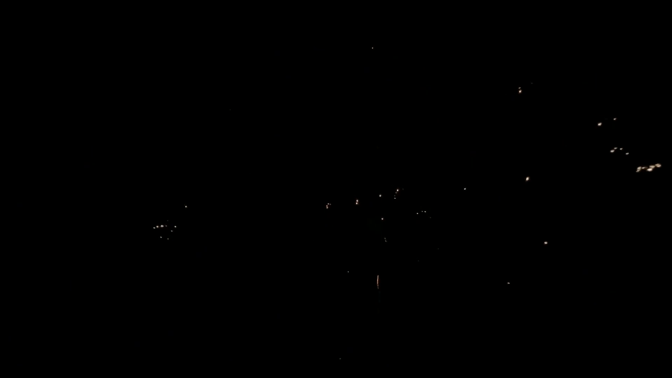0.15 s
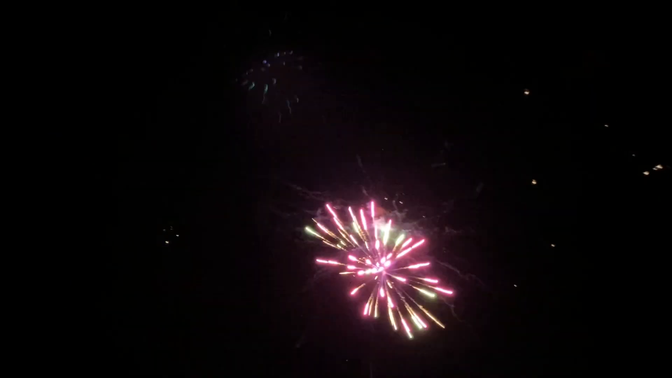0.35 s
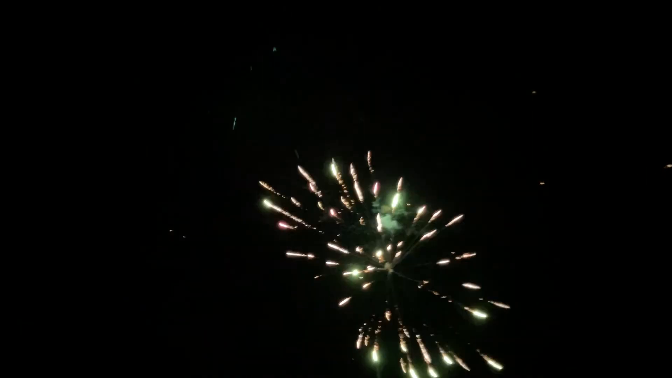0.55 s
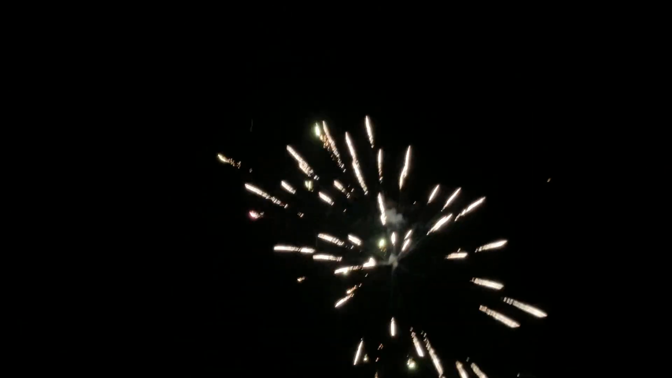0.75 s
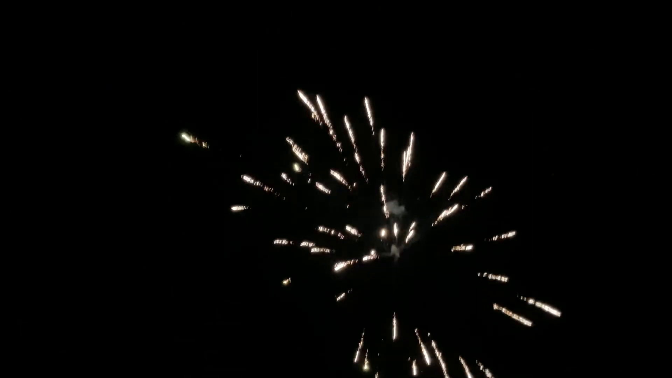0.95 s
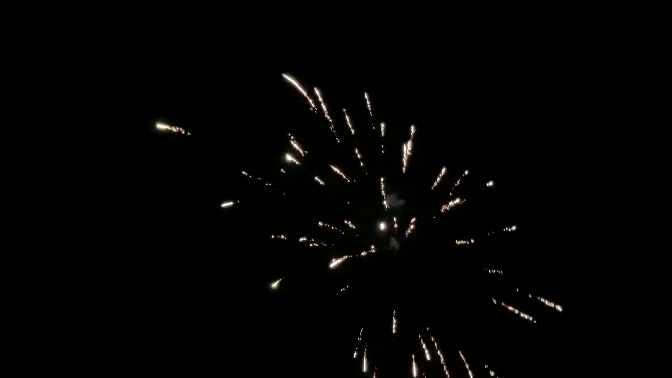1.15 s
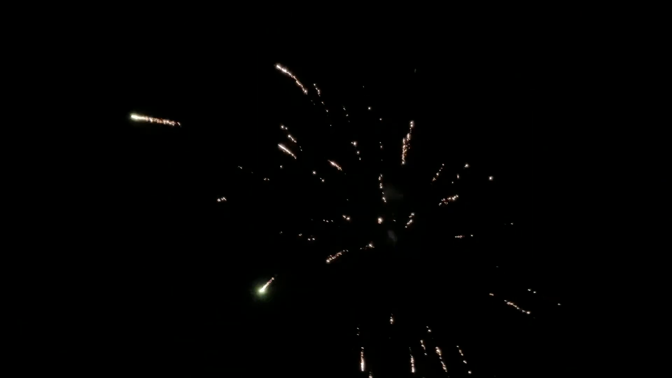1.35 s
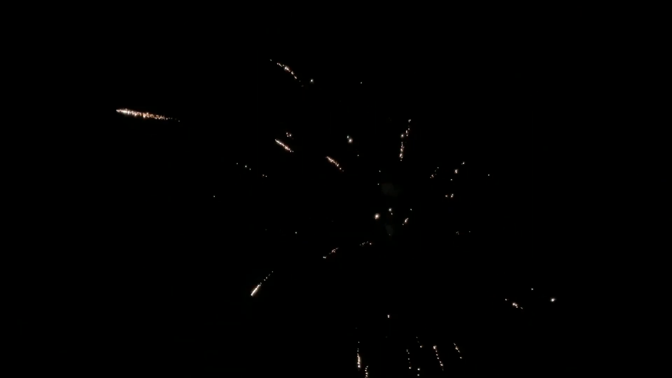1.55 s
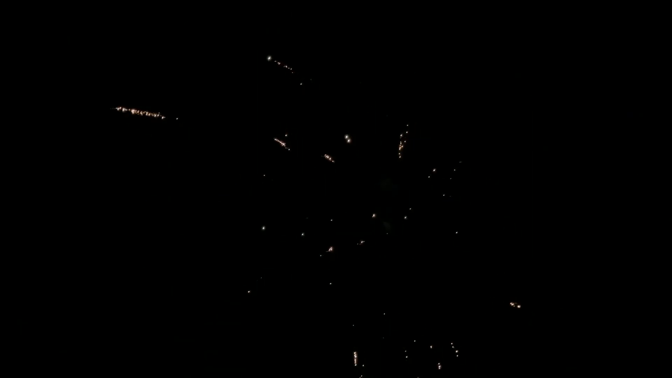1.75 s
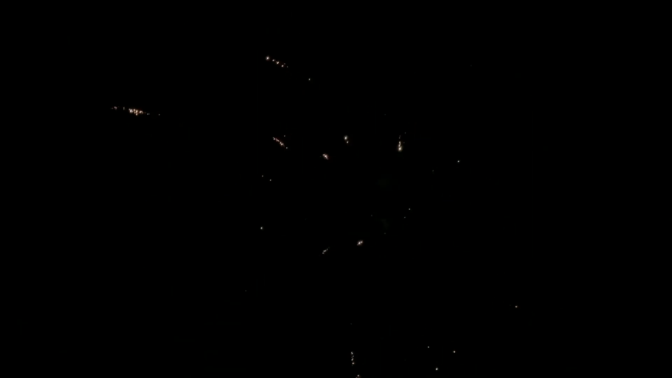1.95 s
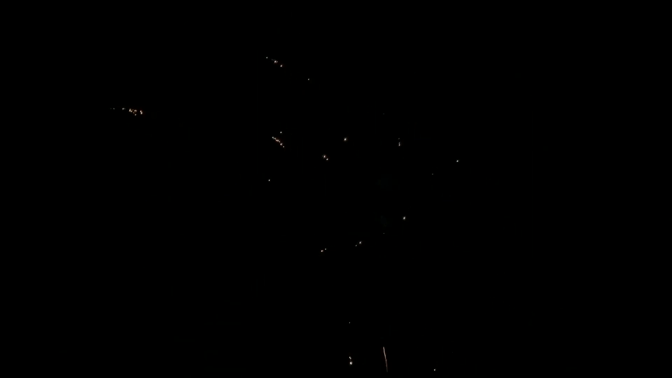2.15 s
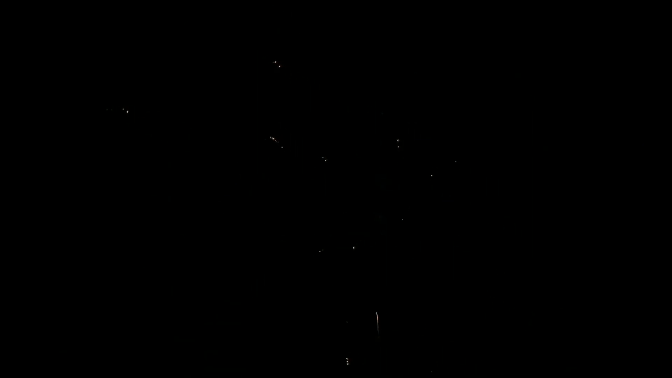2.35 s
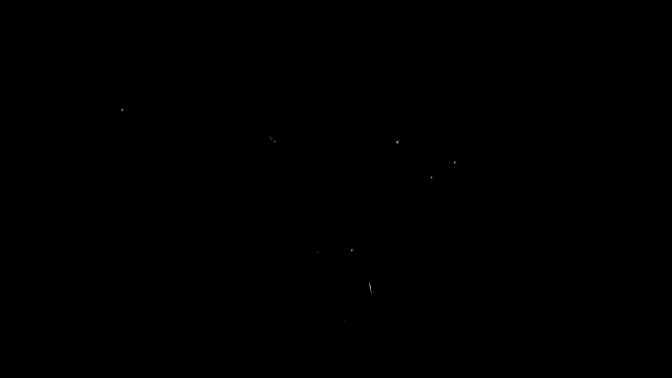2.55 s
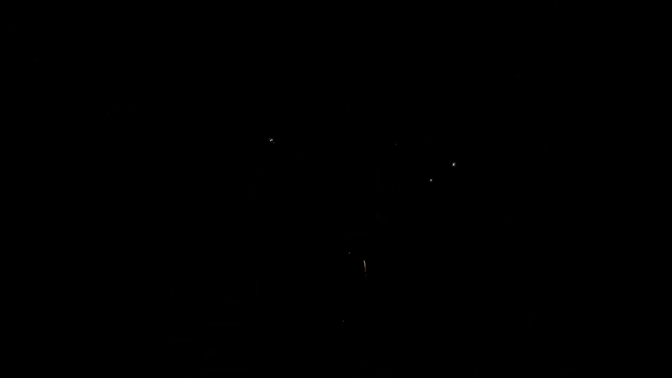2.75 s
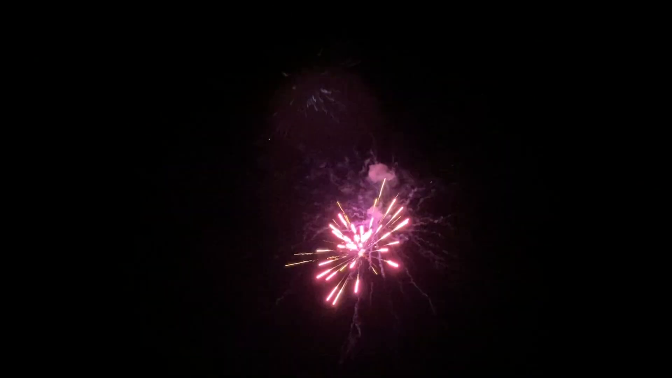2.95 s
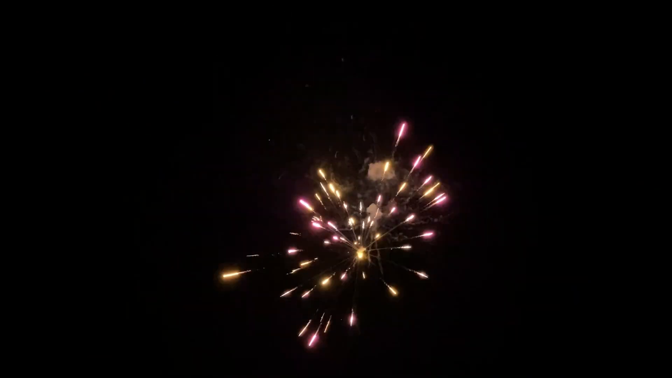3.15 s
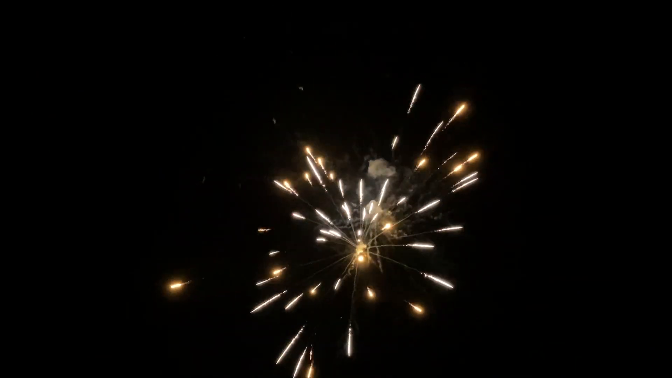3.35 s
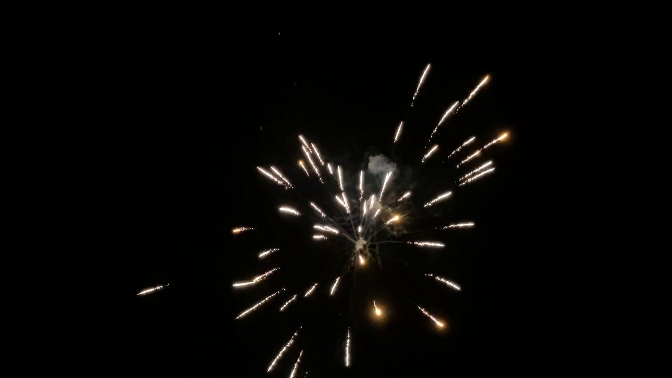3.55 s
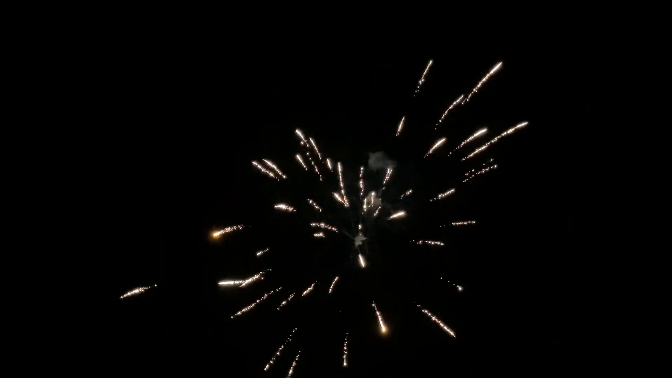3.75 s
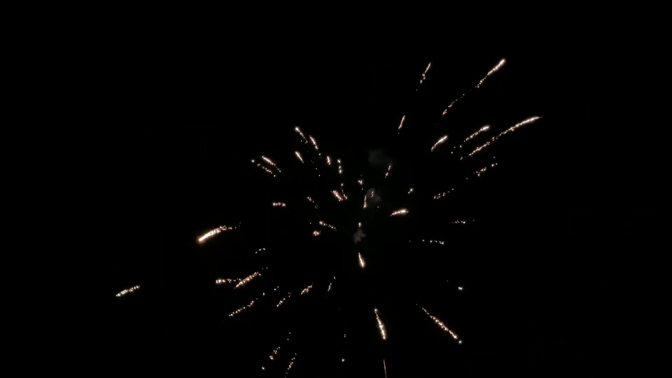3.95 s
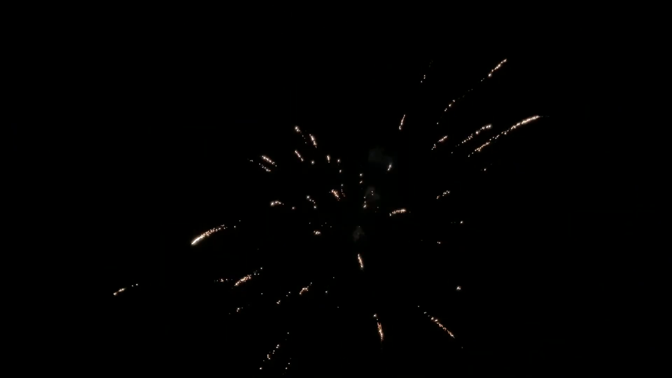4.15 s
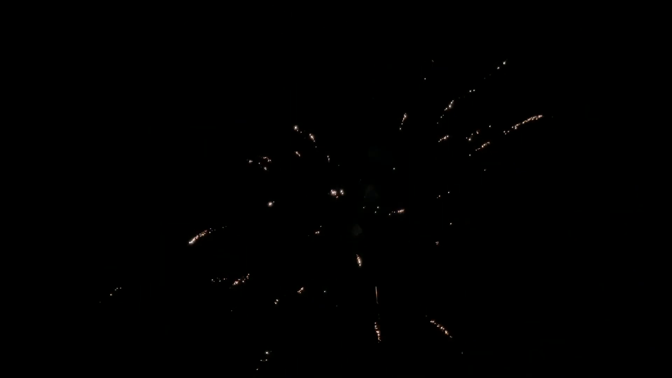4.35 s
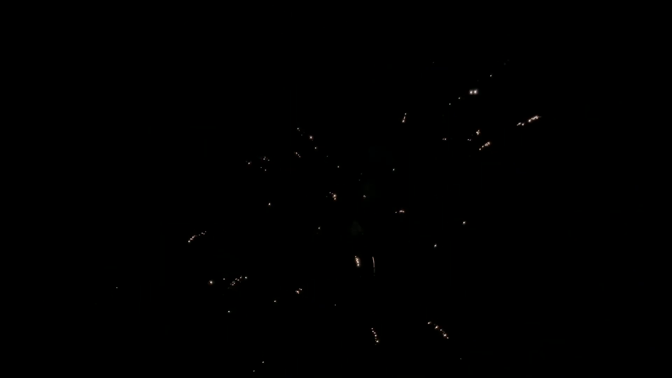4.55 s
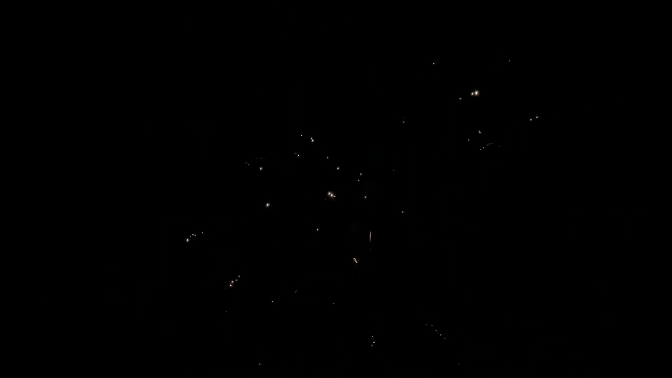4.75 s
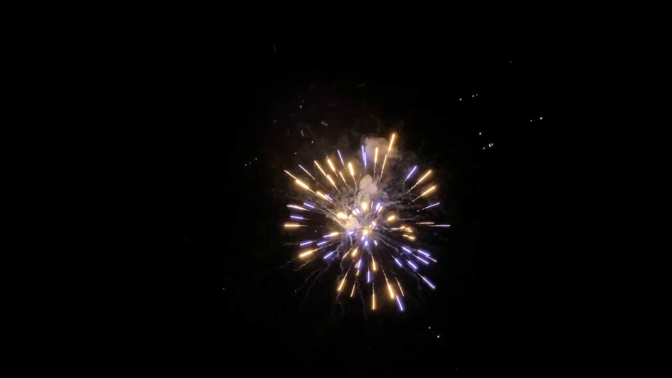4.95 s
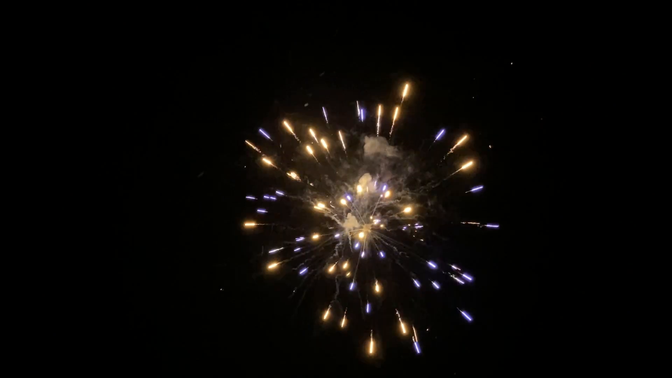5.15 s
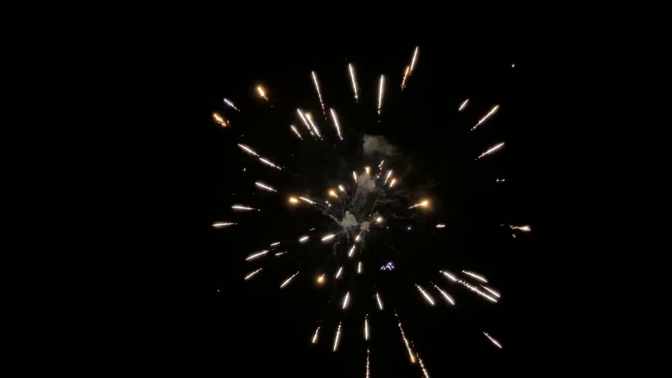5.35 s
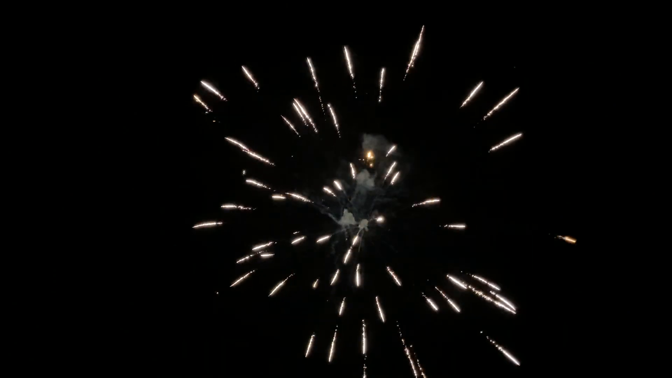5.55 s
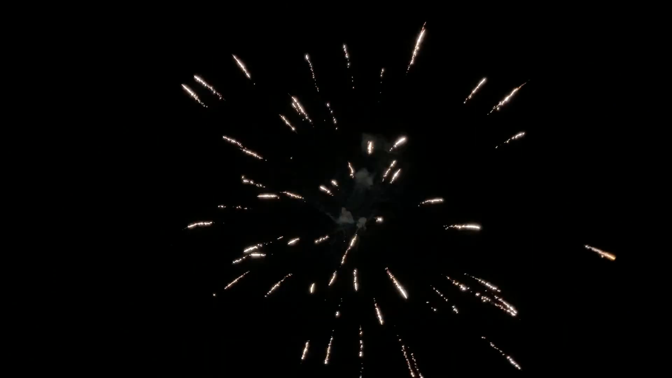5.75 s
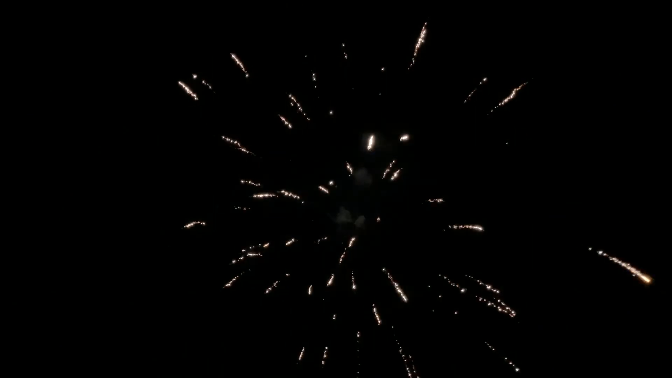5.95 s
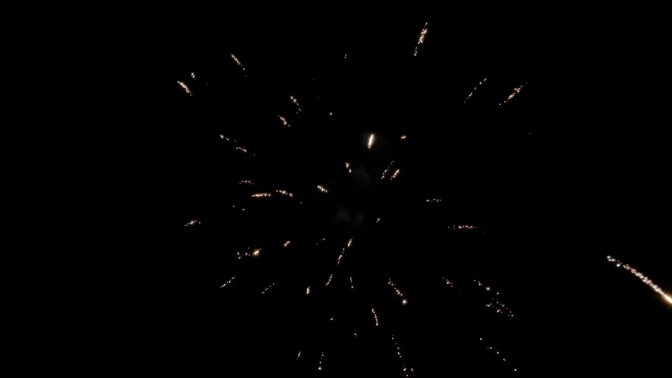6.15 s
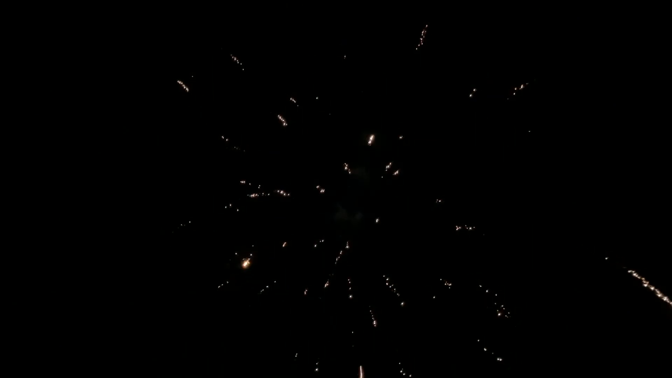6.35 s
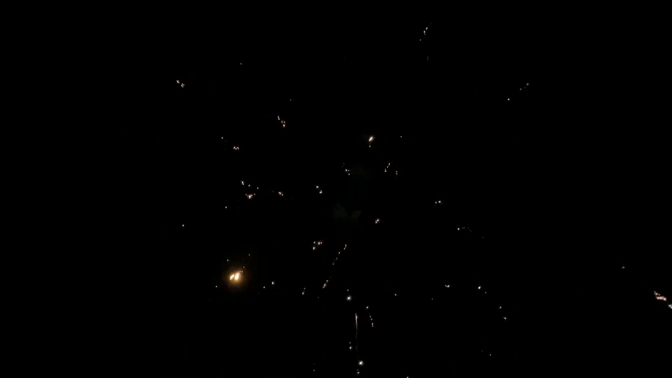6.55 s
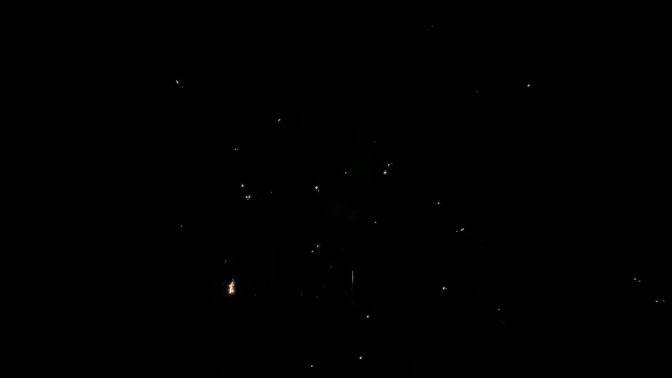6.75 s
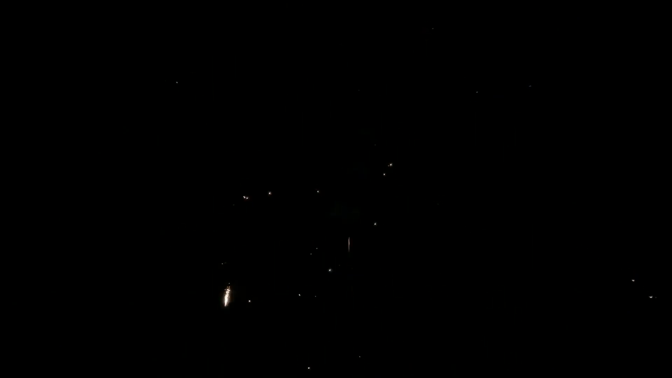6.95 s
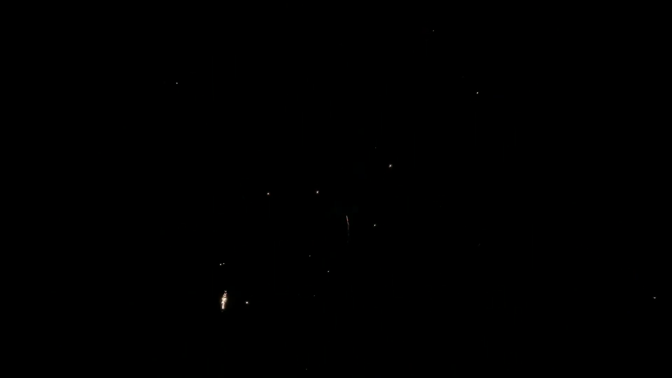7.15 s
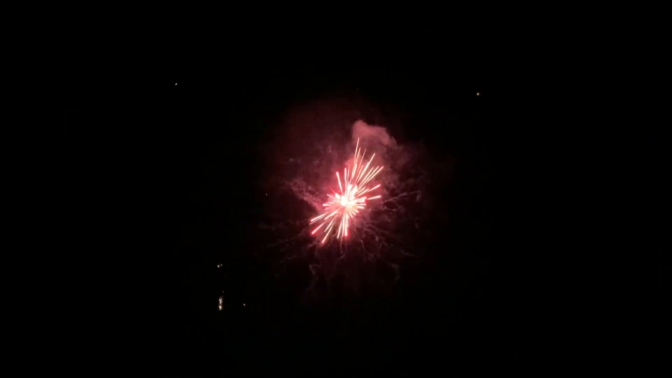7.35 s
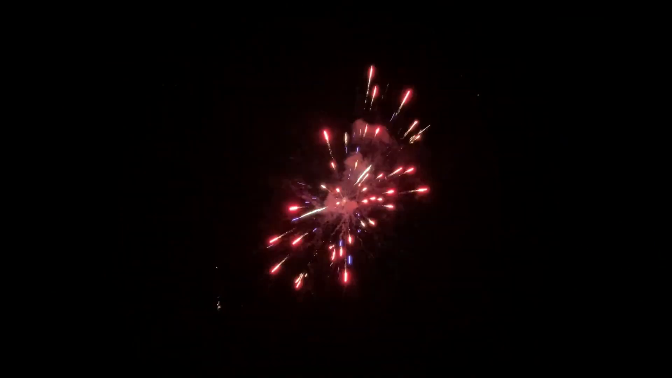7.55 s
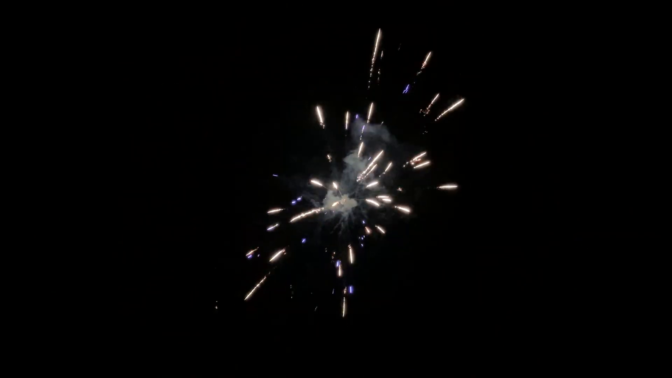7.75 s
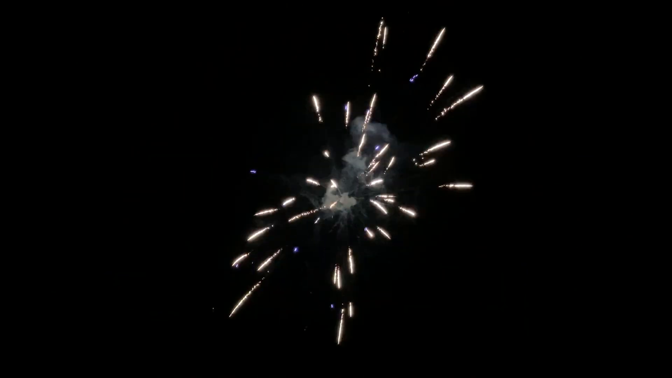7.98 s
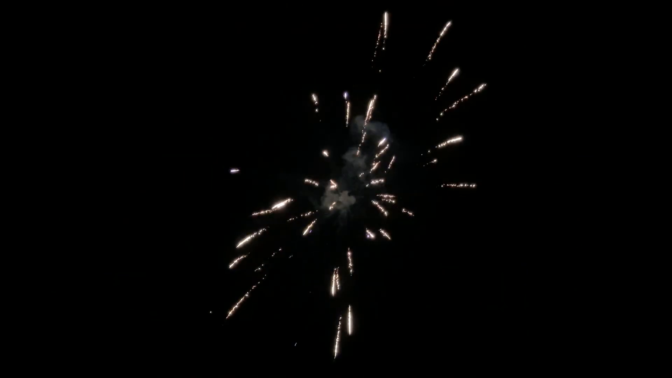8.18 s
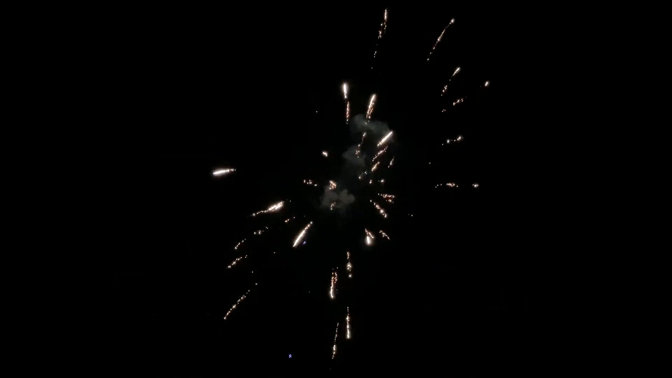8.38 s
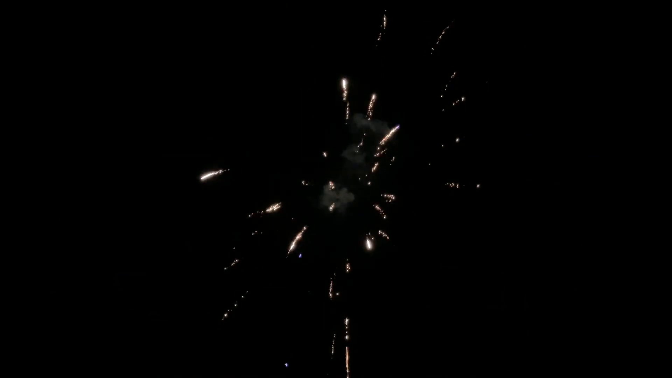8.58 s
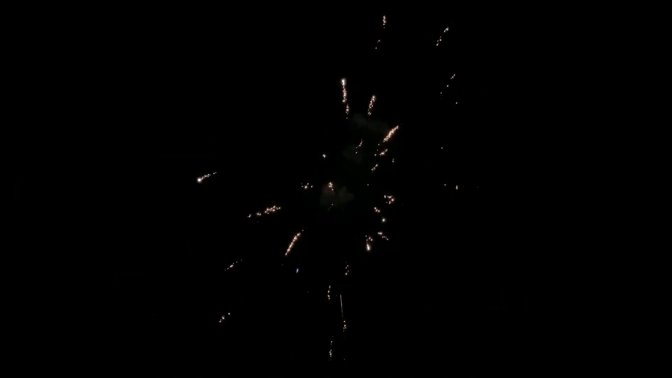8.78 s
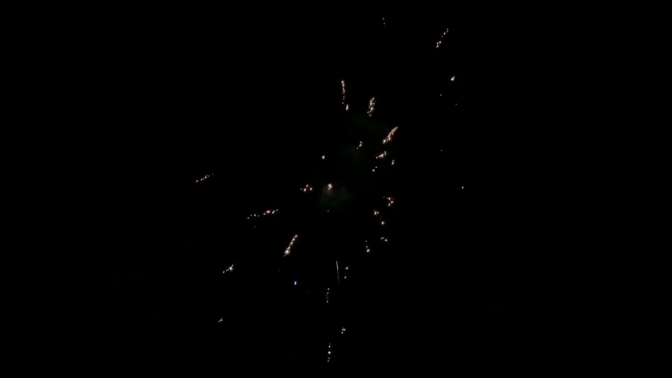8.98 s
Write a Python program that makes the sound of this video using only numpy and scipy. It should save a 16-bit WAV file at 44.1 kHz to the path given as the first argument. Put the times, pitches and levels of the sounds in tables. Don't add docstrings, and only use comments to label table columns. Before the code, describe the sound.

Four loud aerial firework bursts alternate with ground thumps in a yard among houses, their clipped echoes rolling between faint distant pops.

```python
import sys
import numpy as np
from scipy import signal
from scipy.fft import rfft, irfft, next_fast_len
from scipy.io import wavfile
from scipy.ndimage import uniform_filter1d

SR = 44100
rng = np.random.default_rng(int(sys.argv[2]) if len(sys.argv) > 2 else 0)


def rack_gain(trim_db):
    fader = np.asarray(trim_db, float)
    return 10 ** (fader / 20)


def wav_record(signal):
    frames = np.transpose(np.atleast_2d(signal))
    bounded = np.clip(frames, -1, 1)
    quanta = np.round(bounded * 32767).astype(np.int16)
    wavfile.write(sys.argv[1], SR, quanta)


N = 397782
LEFT_LAG = 12

# start_s, strength_db, bright_db, gate_opens_after_s, held_down_db
BURSTS = [
    (0.4688, -2.5, 4, 0.033, 16.5),
    (3.1172, -2.5, 4, 0.034, 13.5),
    (5.06, -2, 0, .001, -4),
    (7.5326, -2.5, 4.5, 0.012, 22.5),
]
# start_s, strength_db, bright_db, gate_opens_after_s,
# held_down_db
LIFTS = [
    (1.6459, -2, -1, .062, 32.5),
    (3.6527, -2.5, -8, 0.00092, 2.5),
    (6.1765, 0.5, 2.5, 0.038, 32.5),
    (8.3981, -1.5, -2.5, .001, 7.5),
]
# delay_s, boom_db, thud_db, snap_db,
# crack_db
SKY_PATHS = [(0, -6, -0.5, -9.5, -6), (.0045, -7, -9.5, -7, -9.5), (.0315, -27.5, -14, -21, -47.5),
             (.036, -14, 1, -10.5, -46.5), (.041, -19, -12.5, -13, -49.5), (.046, -9, -0.5, -10.5, -52),
             (0.051, -14, -13.5, -22.5, -60.5), (.0735, -8.5, -1.5, -20, -29),
             (.099, -24, -19.5, -18.5, -50.5), (.255, -17.5, -23.5, -18.5, -70.5),
             (.268, -11.5, -29, -31, -78.5)]
# first_row_s, second_row_s, gables_s
NEAR_LATE_S = [(.0006, .001, -.0003), (.0009, -.0045, .0016), (.0025, -.003, -.0015), (.0004, .002, .0006)]
# pitch_hz, level_db
BOOM = [(30, -61.5), (70, -22), (130, -1), (200, -3), (300, -4), (500, -29.5), (900, -110)]
# pitch_hz, level_db
THUD = [(100, -74.5), (220, -21), (380, 7), (600, 4.5), (900, -9), (1300, -12.5), (1900, -36.5),
        (3000, -110)]
# pitch_hz, level_db
FAR_SNAP = [(500, -58), (900, -1.5), (1500, 5), (2600, -10), (4500, -20.5), (6500, -88.5)]


def evened(x):
    return x / np.sqrt(np.mean(x ** 2) + 1e-20)


def read(points, hz):
    f, value = np.transpose(points)
    return np.interp(np.log(hz + 1), np.log(f + 1), value)


def filtered(x, gain):
    size = next_fast_len(x.shape[-1] + 4096)
    spectrum = rfft(x, size) * gain(np.fft.rfftfreq(size, 1 / SR))
    return irfft(spectrum, size)[..., :x.shape[-1]]


def chirped(hz):
    # pitch_hz, delay_ms
    bass_delay = [(60, 14), (160, 10), (220, 7.8), (320, 5.6), (500, 4.1), (1000, 2.6), (1600, 1.8),
                  (2100, .1), (3000, 0)]
    turns = np.cumsum(read(bass_delay, hz)) * hz[1] / 1000
    return np.exp(-2j * np.pi * (turns + 0.057))


def train(s, db, lag=LEFT_LAG):
    clicks = np.zeros(N)
    np.add.at(clicks, np.round(s * SR).astype(int), rack_gain(db))
    return np.array([np.roll(clicks, lag), clicks])


def band(clicks, colour):
    hz = np.fft.rfftfreq(4096, 1 / SR)
    peak = abs(irfft(rack_gain(read(colour, hz)) * chirped(hz))).max()
    return filtered(clicks, lambda f: rack_gain(read(colour, f)) / peak)


def alike(z, share):
    return np.sqrt(1 - share) * z + np.sqrt(share) * z.sum(-2, keepdims=True) / np.sqrt(2)


def scatter(t60, seconds):
    t = np.arange(round(seconds * SR)) / SR
    taps = rng.standard_normal((2, len(t))) * rack_gain(-60 * t / t60)
    return taps / np.linalg.norm(taps, axis=1)[:, None]


def through(x, taps):
    return signal.fftconvolve(x, taps, axes=1)[:, :N]


def ahead(clicks, taps):
    return through(clicks[:, ::-1], taps)[:, ::-1]


def ragged(s, db, t60):
    step = np.arange(1200)
    bursts = alike(rng.standard_normal((len(s), 2, len(step))), 0.7) * rack_gain(-60 * step / SR / t60)
    bursts *= rack_gain(db)[:, None, None] / np.linalg.norm(bursts, axis=2, keepdims=True)
    out = np.zeros((2, N))
    at = np.round(s * SR).astype(int)[:, None, None] + step
    np.add.at(out, (np.arange(2)[:, None], at), bursts)
    return out


def trimmed(far_late, near_late, trims):
    wall_of_path = (-1, -1, 0, 0, 0, 1, 1, 2, 2, 3, 3)
    *wall_db, rows_snap_db = trims
    wall_db = wall_db + [0]
    late = list(near_late) + [far_late, 0]
    paths = []
    for (delay, boom, thud, snap, crack), wall in zip(SKY_PATHS, wall_of_path):
        db = wall_db[wall]
        snap_trim = db + rows_snap_db * (wall in (0, 1))
        paths.append((delay + late[wall], boom + db, thud + db, snap + snap_trim, crack + db))
    return paths


def shots():
    # delay_s, boom_db, thud_db, snap_db, crack_db
    ground_paths = [
        (0, -9.5, -1.5, -9, -28),
        (.0034, -0.5, -11, -20, -58),
        (0.012, -31, -18, -24.5, -62.5),
        (0.019, -30, -17, -28.5, -65.5),
        (0.0369, -24, -16, -38, -65),
        (.046, -22.5, -18, -42, -65.5),
        (.075, -27, -30, -42, -76),
        (.22, -32, -35.5, -50, -68),
    ]
    # peak_after_s, rise_db_per_s, body_db, fall_db_per_s
    sky_swarms = [
        (0.033, 750, -13, 129),
        (0.27, 127.5, -23.5, 91),
        (.08, 402.5, -34, 23),
        (0.044, 398, -36, 5),
    ]
    # peak_after_s, rise_db_per_s, body_db, fall_db_per_s
    ground_swarms = [
        (0.031, 700, -24.5, 250),
        (.22, 250, -44, 85),
        (0.023, 200, -36.5, 43),
        (0.078, 600, -42, 9.6),
        (.006, 3000, -32, 350),
    ]
    # bass_db, middle_db, treble_db
    sky_colours = [(-23.5, -15.5, -18), (-9, -9.5, -13.5), (-2, -3.5, -5.5), (1.5, -4.5, -17)]
    # bass_db, middle_db, treble_db
    ground_colours = [(-13.5, -15, -21.5), (-6, -4, -20), (-3.5, -7, -18.5), (3.5, -7, -25),
                      (-20, -3.5, -4.5)]
    far_late_s = (0.003, -.002, -0.002, -0.002)
    # first_row_db, second_row_db, gables_db, far_block_db, rows_snap_db
    wall_trims = [(1., -1, -1, -3.5, -0.5), (0.4, -6., 1, -3.5, 0.), (4, -3, 1, -2.5, 0.5),
                  (0, 0., 0.5, -2., 3.5)]
    fired = []
    for row, far_late, near_late, trims in zip(BURSTS, far_late_s, NEAR_LATE_S, wall_trims):
        fired.append((row, trimmed(far_late, near_late, trims), zip(sky_swarms, sky_colours), 10.5))
    for row in LIFTS:
        fired.append((row, ground_paths, zip(ground_swarms, ground_colours), 0))
    return fired


def held_db(age, opens, down_db, limit_db):
    duck_db, duck_from_s, squeeze_after_s, recover_s, opening_s = 17, .01, 0.036, 0.15, 0.012
    whole = rack_gain(-down_db)
    squeezed_db = limit_db * whole * np.exp(-abs(age) / recover_s) * (age > squeeze_after_s)
    ducking = (age > duck_from_s) & (age <= squeeze_after_s)
    ducked_db = duck_db * (limit_db > 0) * whole * ducking
    return down_db * np.clip((opens - age) / opening_s, 0, 1) + squeezed_db + ducked_db


def fronts():
    rows = []
    for (s, db, bright_db, opens, down_db), paths, _, limit_db in shots():
        delay, boom_db, thud_db, snap_db, crack_db = np.transpose(paths)
        low_db = db - held_db(delay, opens, down_db, limit_db)
        snap_db = low_db + snap_db + 0.33 * bright_db
        rows += zip(s + delay, low_db + boom_db, low_db + thud_db, snap_db, db + bright_db + crack_db)
    return np.transpose(sorted(rows))


def blasts():
    s, boom_db, thud_db, snap_db, crack_db = fronts()
    direct = crack_db > -20
    low = band(train(s, boom_db, 0), BOOM) + band(train(s, thud_db, 0), THUD)
    cracks = train(s, crack_db)
    overhead = train(s[direct], crack_db[direct])
    early = split_ringing(cracks) + gate_leak(s[direct], snap_db[direct])
    return low + snaps(s, snap_db, crack_db, direct) + crackle(cracks, overhead) + early


def snaps(s, snap_db, crack_db, direct):
    # pitch_hz, level_db
    snap_colour = [(500, -91.5), (1100, -21), (1700, 5.5), (2300, 0), (3800, -8.5), (5500, -13.5),
                   (7600, -17.5), (8400, -47.5), (9500, -110)]
    # pitch_hz, level_db
    rough_colour = [(500, -60), (1100, -8), (1700, 5.5), (2400, 1.5), (3800, -12), (5500, -19), (7600, -23),
                    (8600, -60)]
    gap = np.diff(s, prepend=0, append=N)
    crowded = (np.minimum(gap[1:], gap[:-1]) < .016) & ~direct
    lone = ~crowded & ~direct
    clean = train(s[direct], snap_db[direct], 0) + train(s[lone], snap_db[lone])
    far = crack_db < -68
    dull = ragged(s[far], snap_db[far] + 3.5, .08)
    rough_db = snap_db + np.where(crowded, 3., -6.) - 14. * far
    rough = ragged(s, rough_db, .022)
    return band(clean, snap_colour) + band(rough, rough_colour) + band(dull, FAR_SNAP)


def crackle(cracks, overhead):
    # pitch_hz, level_db
    crack_colour = [(6500, -110), (7700, -34.5), (7950, -5), (8600, 6), (10800, -4), (12500, -4),
                    (13600, -13.5), (15500, -12), (16600, -30.5), (17500, -110)]
    # pitch_hz, level_db
    rattle_colour = [(8000, -11), (9200, -8), (10000, 0), (12800, -3), (13300, -34), (14300, -34),
                     (14850, -15), (15400, -44)]
    lower = cracks - overhead
    rattle = rack_gain(-6) * through(cracks, alike(scatter(0.03, .6), 0.974))
    rattle += rack_gain(-16.5) * through(overhead + .15 * lower, alike(scatter(0.7, .6), 1.0))
    rattle += rack_gain(-7.) * through(lower, alike(scatter(.22, .3), .9))
    rattle = filtered(rattle + lower, lambda f: rack_gain(read(rattle_colour, f)))
    return band(overhead + .15 * lower + rattle, crack_colour)


def split_ringing(cracks):
    t = np.arange(round(.03 * SR)) / SR
    ring = np.cos(2 * np.pi * 8010 * t) * (rack_gain(-21 - 60 * t / .012) + rack_gain(-26 - 60 * t / .1))
    ring *= np.cos(np.pi * t / t[-1] / 2) ** 2
    return ahead(cracks, ring[None])


def gate_leak(s, snap_db):
    # pitch_hz, level_db
    leaks = [(1250, 8), (3500, 0), (5500, -7), (6500, -13)]
    leak_db = (-6.5, -1.5, -4., -8)
    length = round(.025 * SR)
    noise = alike(scatter(0.1, .025), 0.62) * np.hanning(2 * length)[length:]
    taps = filtered(noise, lambda f: sum(rack_gain(db) / (1 + ((f - hz) / 220) ** 2) for hz, db in leaks))
    share_db = np.add.outer(leak_db, (2., -6.)).ravel()
    return rack_gain(26.5) * ahead(train(s, snap_db + share_db, 0), taps)


def tubes():
    # low_hz, low_db, high_hz, high_db
    tube_rings = [
        (2178, -5, 3900, -1.5),
        (1754.8, -8.5, 4200, -18),
        (1746.7, 0.5, 4300, -8.5),
        (2394, -4, 3800, -7),
    ]
    mouth_db = (-16, -24., -11, -12)
    t = np.arange(round(.02 * SR)) / SR
    out = np.zeros(N)
    for (s, db, _, opens, down_db), rings, top_db in zip(LIFTS, tube_rings, mouth_db):
        low_hz, low_db, high_hz, high_db = rings
        ring = rack_gain(low_db) * np.sin(2 * np.pi * low_hz * t)
        ring += rack_gain(high_db) * np.sin(2 * np.pi * high_hz * t)
        ring += rack_gain(top_db) * np.sin(2 * np.pi * 5250 * t)
        decay = rack_gain(db - held_db(0, opens, down_db, 0) - 60 * t / .008)
        out[round(s * SR):][:len(t)] += decay * np.minimum(t / 0.00049, 1) * ring
    return out


def gables():
    # pitch_hz, level_db
    gable_colour = [(1200, -50), (2300, -7), (3500, 0), (5000, -3), (7000, -15), (9000, -14), (11000, -30),
                    (13000, -60)]
    gable_db = (-10., -7.5, -16., -9.)
    delay = SKY_PATHS[7][0]
    s = [row[0] + delay + near_late[2] for row, near_late in zip(BURSTS, NEAR_LATE_S)]
    return band(train(np.array(s), gable_db), gable_colour)


def slaps():
    # start_s, level_db, pitch_hz
    short_clicks = [(3.687, -14., 630), (3.698, -18., 600), (8.408, -23., 630), (8.4335, -14., 640),
                    (8.442, -16., 700), (8.451, -21, 650), (8.399, -12.5, 700), (3.6535, -13.5, 730),
                    (8.415, -23., 700), (3.112, -30., 3500), (3.119, -24., 4200), (3.651, -12., 1750),
                    (6.174, -38., 1750), (8.398, -13., 2600), (5.0596, -9., 1300), (5.061, -12.5, 4100),
                    (0.64, -22., 1350), (5.055, -16., 3600), (5.055, -20., 8000), (5.0645, -18., 4000),
                    (5.0605, -12., 2800), (5.098, -13., 2100), (5.101, -17., 1600), (5.105, -19., 1700),
                    (7.563, -19., 2100), (7.575, -9, 2020), (7.785, -19., 1518), (7.5725, -10., 430),
                    (7.557, -15., 450), (7.5645, -11., 600), (7.789, -26., 3000), (2.3, -44, 1200),
                    (.509, -15., 1800), (3.149, -22., 3000), (3.156, -11., 1700), (3.161, -11., 2200),
                    (.5075, -12., 450), (7.568, -14., 1500), (5.106, -14., 390), (6.21, -20., 710),
                    (6.222, -24., 500), (6.232, -25., 390), (1.707, -27., 600)]
    wall_lag = 5
    t = np.arange(round(.014 * SR)) / SR
    out = np.zeros((2, N))
    for s, db, hz in short_clicks:
        part = np.minimum(hz * t / 3, 1)
        slap = np.sin(np.pi * np.sqrt(part)) ** 2 * np.sin(2 * np.pi * hz * t)
        high = int(hz > 3200)
        out[high, round(s * SR):][:len(t)] += rack_gain(db) * slap
    left = np.roll(out[0], wall_lag) + np.roll(out[1], LEFT_LAG)
    return np.array([left, out.sum(0)])


def echo_levels(t):
    ageing = (1, 0, 4.5, 15)
    gate_shuts = [1.262, 2.153, 4.18, 5.909, 6.723, 8.814]
    # start_s, hold_s, body_db, bass_db re body, treble_db re body
    pumps = [(0.172, 0.07, -51, -2.5, -18), (0.306, .14, -64, -2, -23.5), (1.286, .22, -61.5, -7.5, -13),
             (1.556, .03, -56.5, 6.5, -18), (2.17, .07, -62, 0, -22), (2.71, .12, -62, 3, -24),
             (2.232, .06, -54.5, 0.5, -27), (2.366, .08, -59, 5, -25), (2.491, .14, -57.5, 4, -23),
             (2.672, .03, -53.5, 4.5, -32), (2.837, .24, -56, 13, -35.5), (4.269, .02, -63, -4.5, -14),
             (4.306, .02, -56.5, 3, -21.5), (4.36, .35, -73, -2.5, -16), (4.748, .28, -62, -3, -23.5),
             (5.935, .03, -57, -4, -20), (5.99, .1, -64, -3.5, -16), (6.095, .07, -64, -3, -18.5),
             (6.768, 0.32, -61, -4, -20), (7.139, 0.13, -53, -2.5, -29), (7.347, .17, -60, 0.5, -24.5),
             (8.839, .2, -56, -5.5, -19)]
    power = np.full((4, len(t)), 1e-10)
    for (s, db, bright_db, opens, down_db), _, swarms, limit_db in shots():
        age = t - s
        shut = min(g for g in gate_shuts if g > s)
        gate_db = db - 0.62 * held_db(age, opens, down_db, limit_db)
        gate_db = gate_db - 802.5 * np.maximum(t - shut, 0)
        aged_db = np.outer(ageing, np.maximum(age, 0))
        for (peak, rise, body_db, fall), (bass, middle, treble) in swarms:
            shape_db = body_db + np.minimum(rise * (age - peak), -fall * (age - peak))
            tint_db = np.array([bass, 0, middle, treble])[:, None]
            power += rack_gain(gate_db + shape_db + tint_db - aged_db) ** 2
    for s, hold, db, bass, treble in pumps:
        rise_db = np.minimum(550 * (t - s), 0)
        shape_db = db + np.minimum(rise_db, 300 * (s + hold - t))
        power += rack_gain(shape_db + np.array([bass, 0, -5.5, treble])[:, None]) ** 2
    return 10 * np.log10(power)


def grains(size):
    per_s, spread_db, lag = 400, 4, 3
    hit = rng.random((2, size)) < per_s / SR / 2
    depth = rng.exponential(1, (2, size))
    a, b = hit * rack_gain(spread_db * np.minimum(depth, 3))
    return evened(np.array([a + np.roll(b, lag), np.roll(a, lag) + b]))


def rumble():
    # pitch_hz, level_db per Hz
    roll_colour = [(15, -44.5), (35, -10.5), (60, 2), (230, -2.5), (420, -10.5), (800, -13), (1600, -21),
                   (2400, -23.5), (3200, -30.5), (4600, -34.5), (5600, -44), (7400, -45), (8300, -53.5)]
    band_centres = (70, 330, 1500, 4500, 8000)
    lumpy_db, patchy_db, grain_share = 1.1, 2.2, .24
    hop, hz = 128, np.fft.rfftfreq(512, 1 / SR)
    frames = N // hop + 5
    t = np.arange(frames) * hop / SR
    level_db = echo_levels(t)

    def sound(field):
        return signal.istft(field, nperseg=512, noverlap=384)[1]

    def fine(f):
        return rack_gain(read(roll_colour, f)) * (f < 8300)

    colour = rack_gain(read(roll_colour, hz))
    edges = np.searchsorted(hz, (30, 150, 700, 3000, 8000))
    own_db = 10 * np.log10([np.sum(colour[a:b] ** 2) for a, b in zip(edges, edges[1:])])
    tilt_db = (level_db - level_db[1]).T - own_db + own_db[1]
    treble_db = tilt_db[:, -1]
    top_db = treble_db + .8 * np.minimum(treble_db - 5., 0)
    tilt_db = np.c_[tilt_db, top_db]
    weights = np.array([read(list(zip(band_centres, row)), hz) for row in np.eye(len(band_centres))])

    z = rng.standard_normal((5, len(hz), frames))
    patches = evened(uniform_filter1d(uniform_filter1d(z[4], 6, 0), 14, 1))
    noise = z[:2] + 1j * z[2:4]
    wash = alike(noise.swapaxes(0, 1), .06).swapaxes(0, 1)
    size = sound(wash[..., :600])[1].std()
    single = signal.stft(size * grains((frames - 1) * hop), nperseg=512, noverlap=384)[2]
    field = np.sqrt(1 - grain_share) * wash + np.sqrt(grain_share) * single
    field = field * rack_gain(patchy_db * patches + (tilt_db @ weights).T)
    body = filtered(sound(noise[..., :600]), lambda f: fine(f) * (f > 150) * (f < 700))
    x = filtered(sound(field), fine)[:, :N] / body.std()

    lumps = evened(uniform_filter1d(uniform_filter1d(rng.standard_normal(N), 300), 300))
    body_db = np.interp(np.arange(N) / SR, t, level_db[1])
    return x * rack_gain(body_db + 0.6 + lumpy_db * lumps)


def ticks():
    # start_s, level_db, low_edge_hz
    embers = [
        (4.4596, -31, 11300),
        (4.667, -57, 10500),
        (4.845, -38, 11300),
        (8.86, -48, 4000),
        (2.258, -56, 2500),
        (7.231, -55, 3000),
        (2.553, -56, 2500),
    ]

    def thin(f, edge_hz):
        return 1 / np.sqrt(1 + (edge_hz / (f + 1)) ** 7)

    out = np.zeros((2, N))
    for s, db, hz in embers:
        click = train(np.array([s]), db + 10)
        out += filtered(click, lambda f: thin(f, hz) * thin(2.4 * hz, f))
    return out


def pops():
    # start_s, peak_db
    far_pops = [(0.166, -42), (0.358, -56), (1.43, -47.5), (1.574, -44.5), (2.227, -45), (2.249, -44),
                (2.553, -50), (2.647, -45), (2.695, -42), (2.418, -40.5), (2.519, -40), (2.577, -43),
                (2.781, -41.5), (2.806, -46), (2.834, -39), (2.873, -40.5), (4.263, -40.5), (4.31, -37.5),
                (4.551, -63), (4.748, -49.5), (4.778, -60), (4.808, -41.5), (4.92, -50), (6.717, -42),
                (6.837, -46), (6.87, -38.5), (7.038, -38.5), (7.153, -48), (7.23, -48), (7.279, -48)]
    s, db = np.transpose(far_pops)
    clicks = train(s, db - 4.0, 0)
    trace = band(ragged(s, db - 11, 0.019), FAR_SNAP)
    return rack_gain(-5.5) * band(clicks, BOOM) + band(clicks, THUD) + trace


def cricket():
    # start_s, level_db
    chirps = [
        (.04, -84),
        (.34, -86),
        (2.222, -82),
        (2.563, -81),
        (2.887, -81),
        (4.455, -86),
        (7.338, -85),
    ]
    stroke_s, gap_s = .024, .052
    t = np.arange(round(stroke_s * SR)) / SR
    hz = 4850 - 400 * t / stroke_s
    stroke = np.hanning(len(t)) * np.sin(2 * np.pi * np.cumsum(hz) / SR)
    out = np.zeros(N)
    for s, db in chirps:
        for k in range(3):
            out[round((s + k * gap_s) * SR):][:len(t)] += rack_gain(db) * stroke
    return out


def hiss():
    # pitch_hz, level_db
    sizzle = [(3000, -11), (5000, 5.5), (8500, -8), (9200, -3), (10000, -1.5), (12800, 0), (13600, -25.5),
              (16500, -37.5)]
    left, right = alike(rng.standard_normal((2, N)), 0.62)
    z = np.array([np.roll(left, LEFT_LAG), right])
    size = filtered(z, lambda f: rack_gain(read(sizzle, f)) * (f > 9000) * (f < 13000)).std()
    return rack_gain(-90) * filtered(z, lambda f: rack_gain(read(sizzle, f)) * (f > 3000)) / size


def night():
    # pitch_hz, level_db
    town = [(25, -29.5), (60, 4.5), (110, -3), (300, -6.5), (800, -11), (1500, -15), (2600, -23),
            (3100, -32), (5000, -41), (7000, -89)]
    swell = evened(uniform_filter1d(uniform_filter1d(rng.standard_normal(N), 2500), 2500))
    wash = evened(filtered(rng.standard_normal((2, N)), lambda f: rack_gain(read(town, f))))
    return rack_gain(-60 + 1.2 * swell) * wash


def scene():
    shells = blasts() + tubes() + gables() + slaps() + rumble()
    return shells + ticks() + pops() + cricket() + hiss() + night()


def band_limit(x):
    return signal.sosfilt(signal.butter(12, 16970, fs=SR, output="sos"), x)


def record(dry):
    mono_hz, edge_hz = 1000, 16700
    left, right = np.clip(filtered(dry, chirped), -.86, .86)
    side = filtered(left - right, lambda f: 1 / np.sqrt(1 + (mono_hz / (f + 1)) ** 20)) / 2
    mid = (left + right) / 2
    pair = np.array([mid + side, mid - side])
    return band_limit(filtered(pair, lambda f: 1 / (1 + (f / edge_hz) ** 120)))


dry = scene()
out = record(dry)
wav_record(out)
```